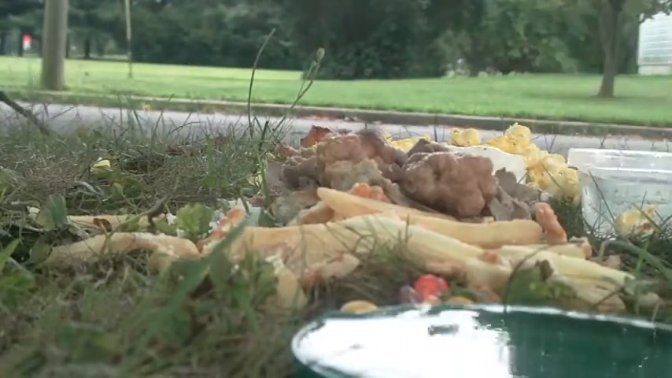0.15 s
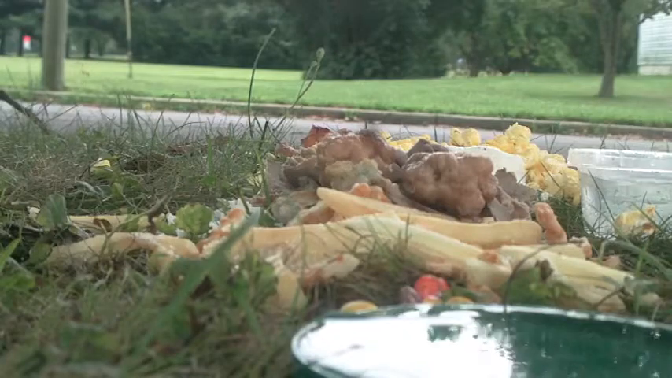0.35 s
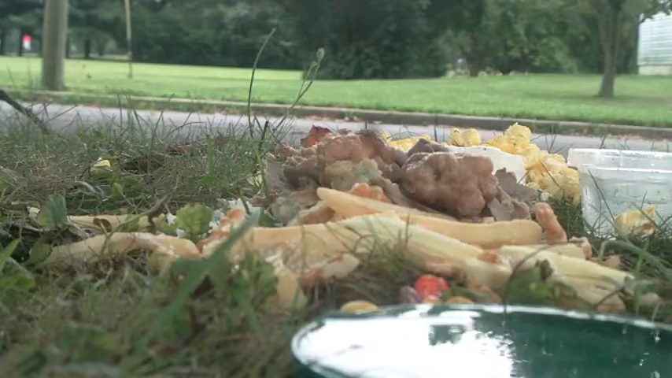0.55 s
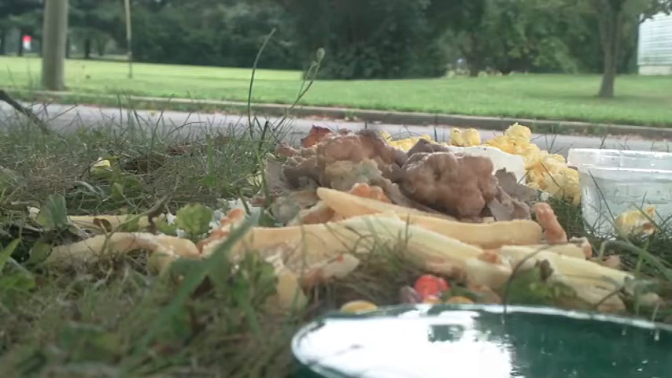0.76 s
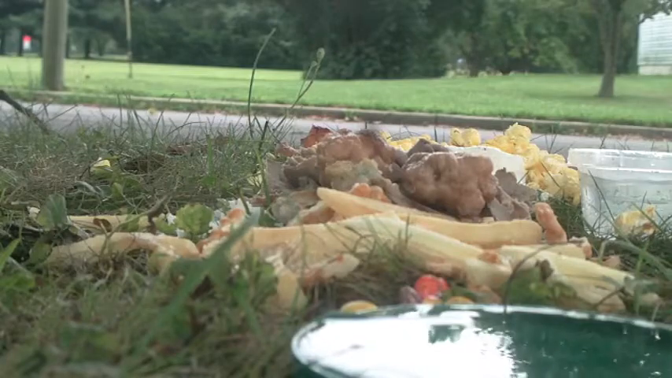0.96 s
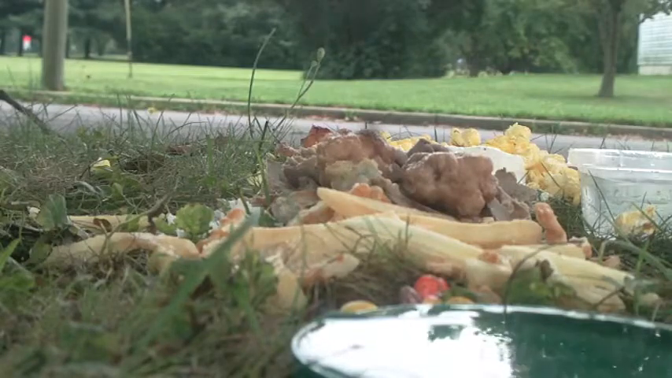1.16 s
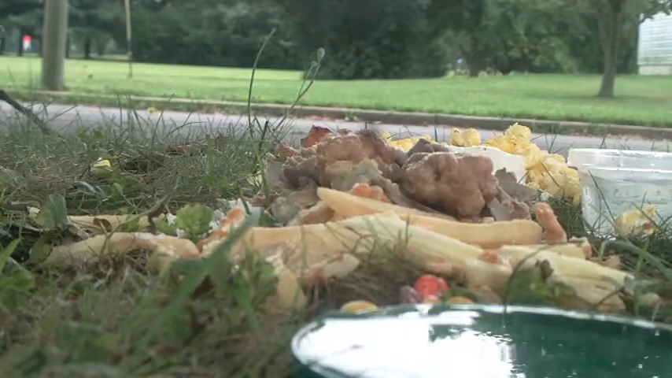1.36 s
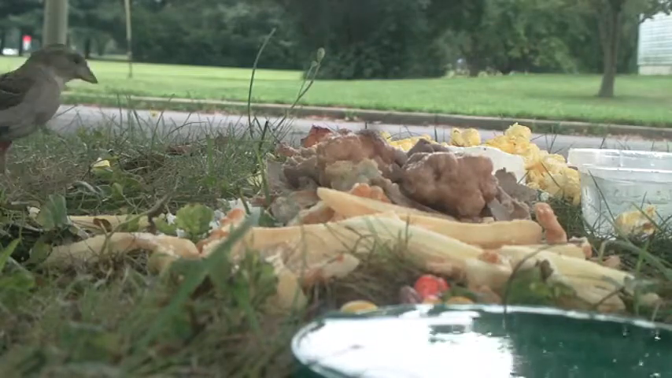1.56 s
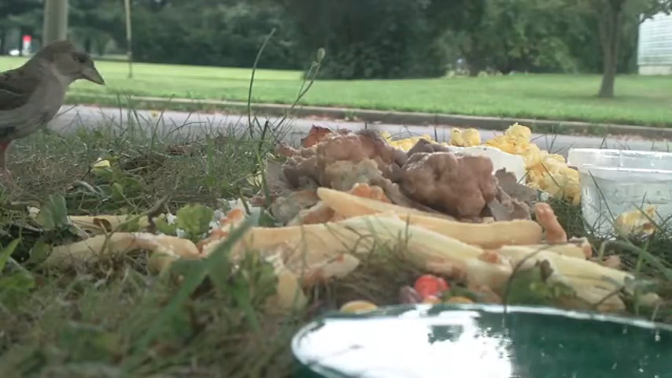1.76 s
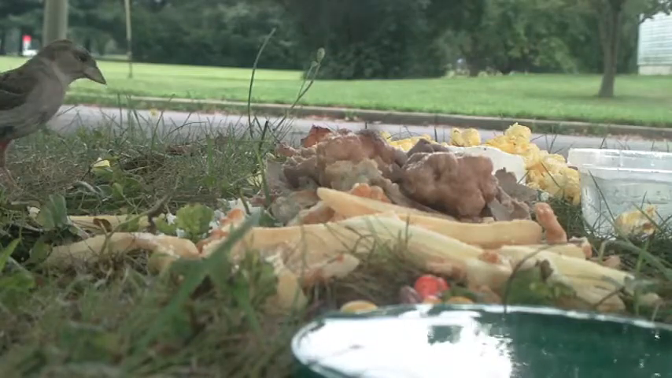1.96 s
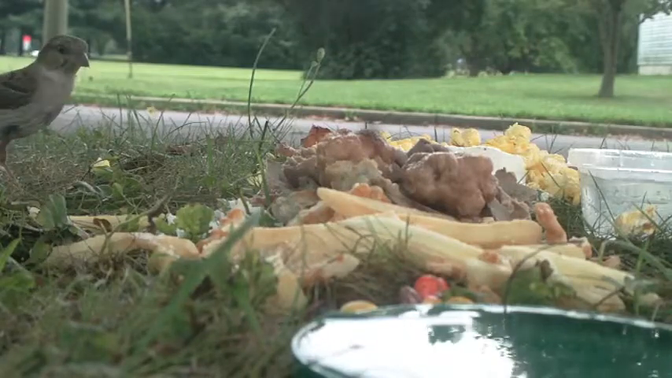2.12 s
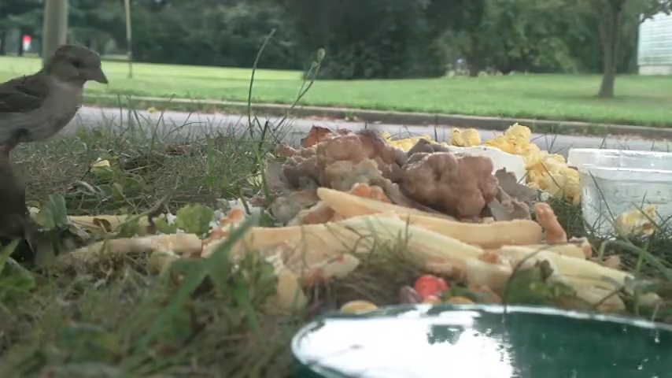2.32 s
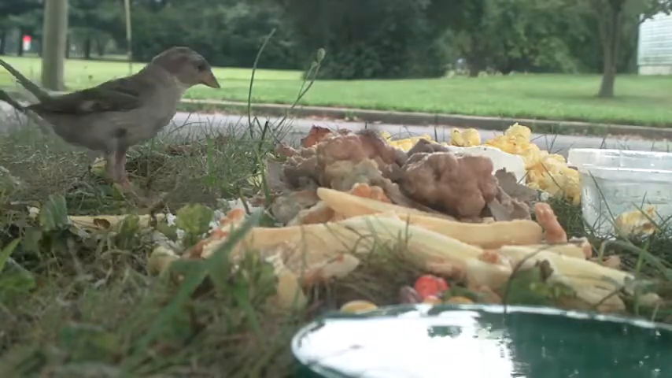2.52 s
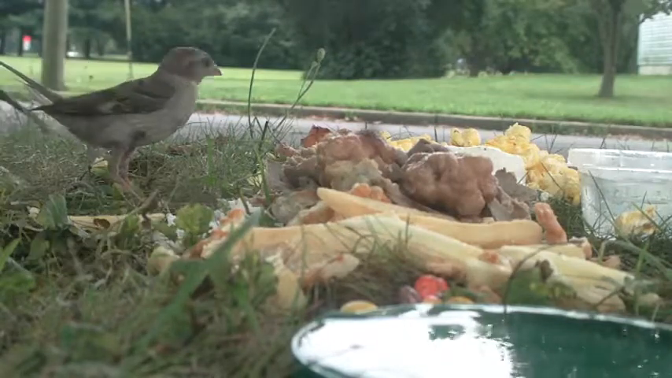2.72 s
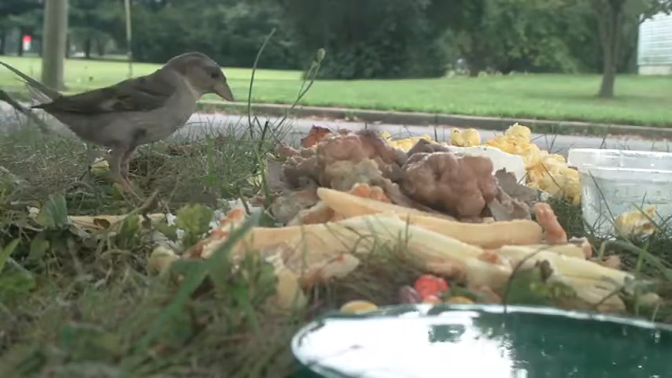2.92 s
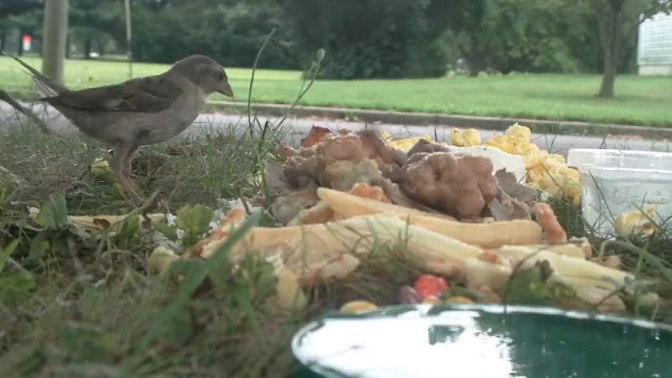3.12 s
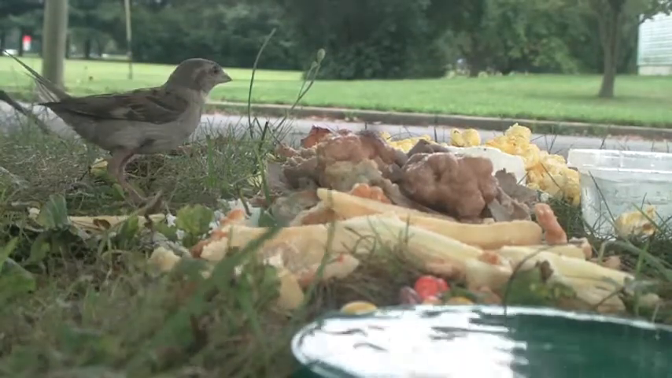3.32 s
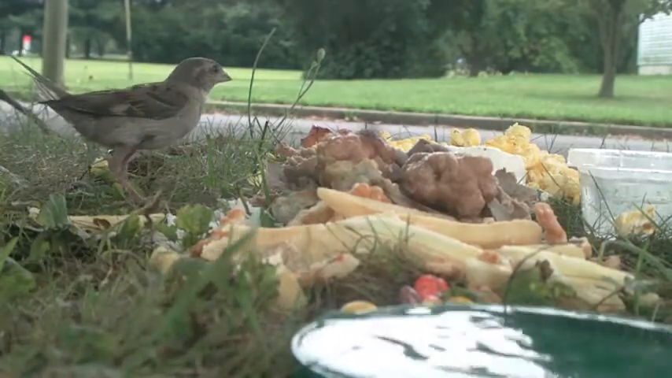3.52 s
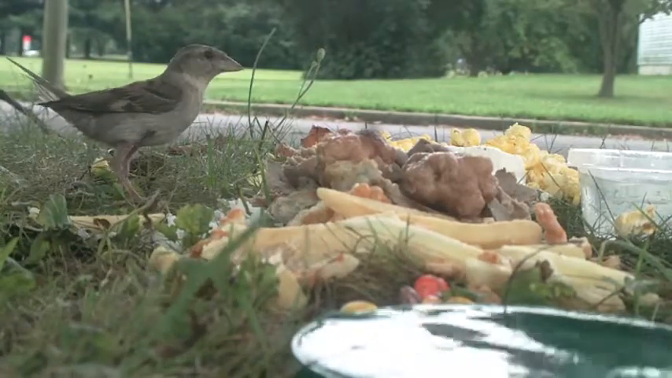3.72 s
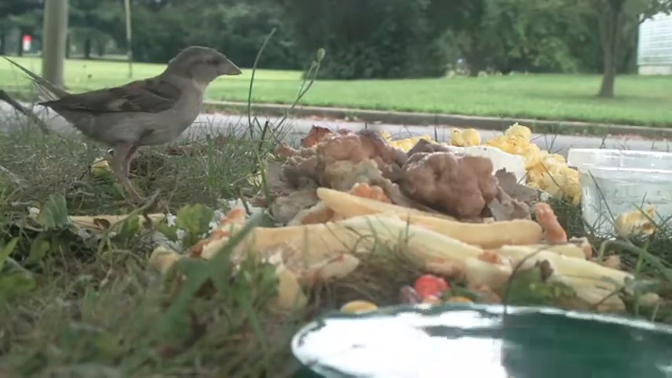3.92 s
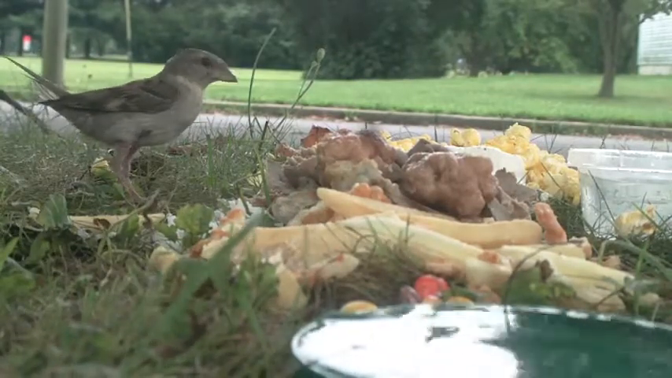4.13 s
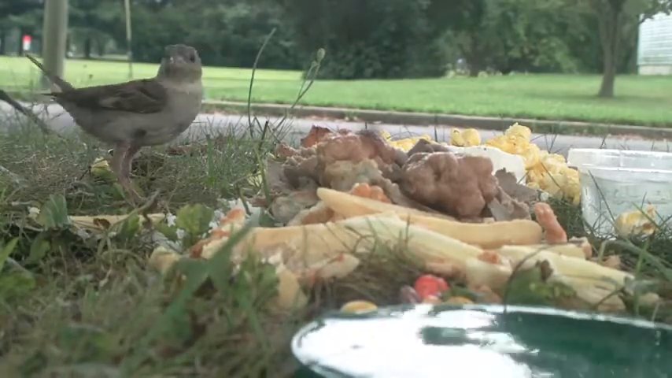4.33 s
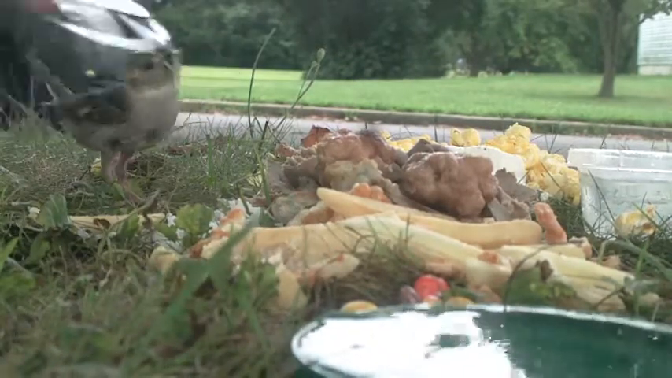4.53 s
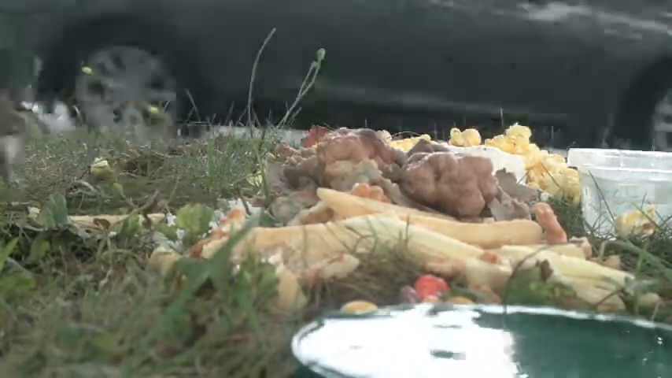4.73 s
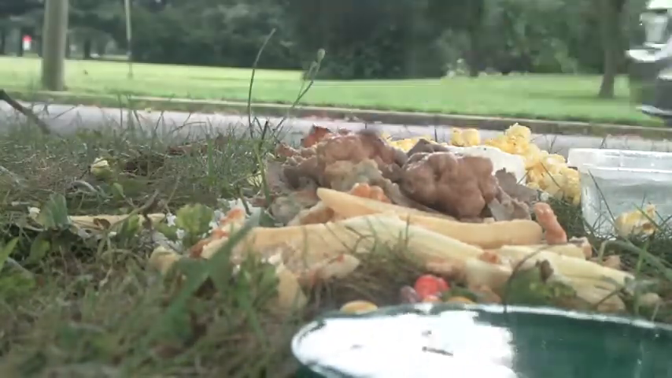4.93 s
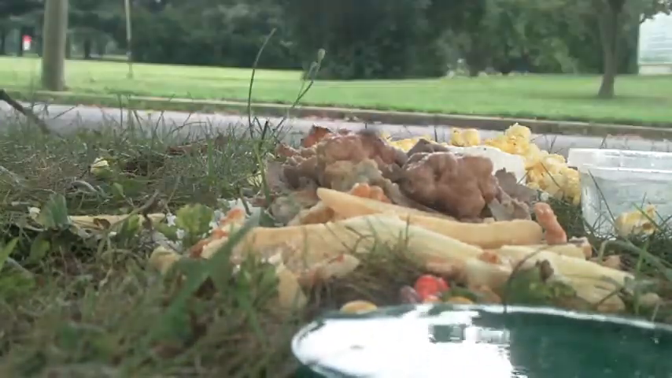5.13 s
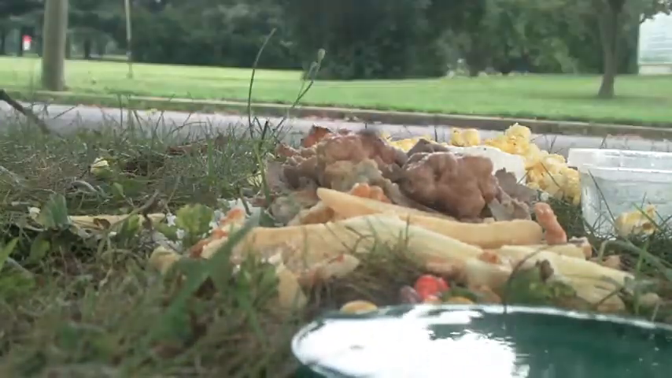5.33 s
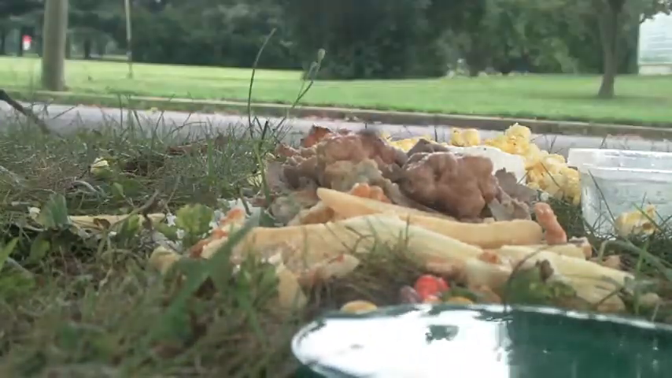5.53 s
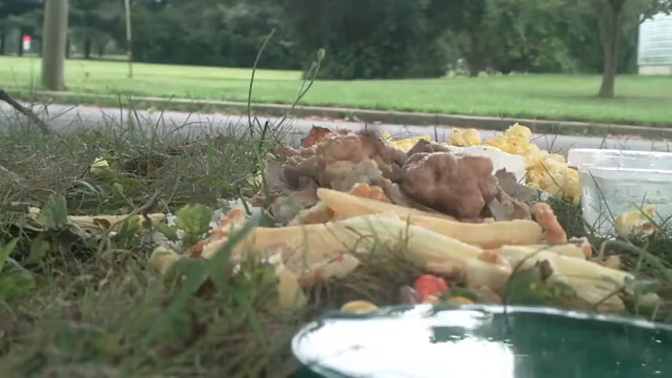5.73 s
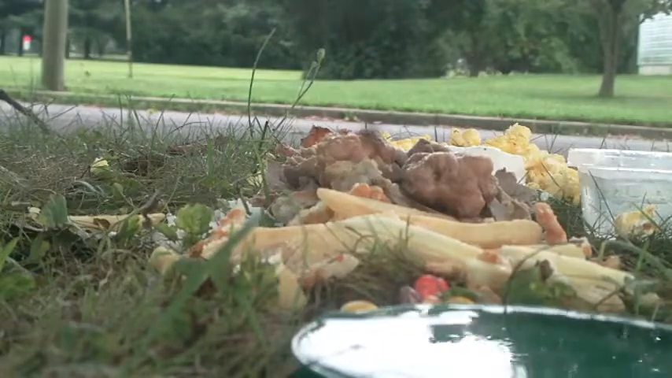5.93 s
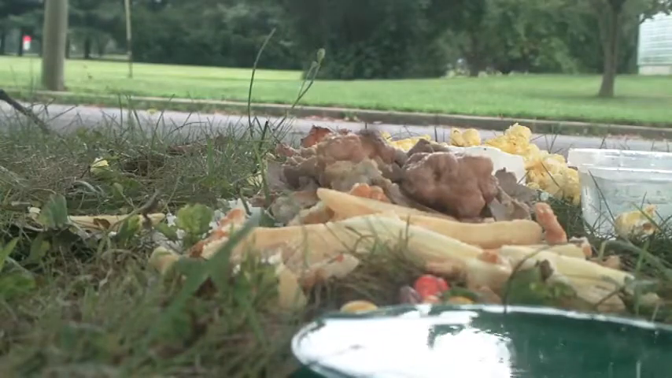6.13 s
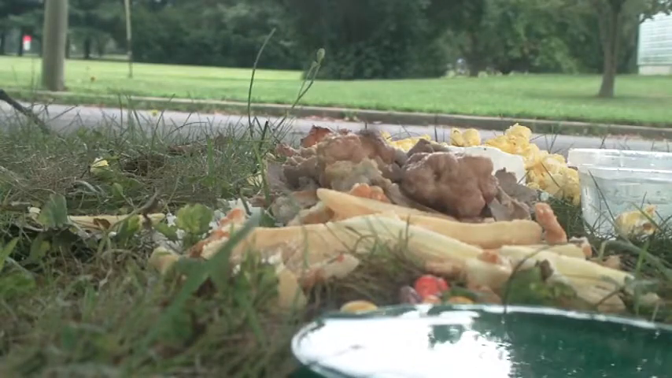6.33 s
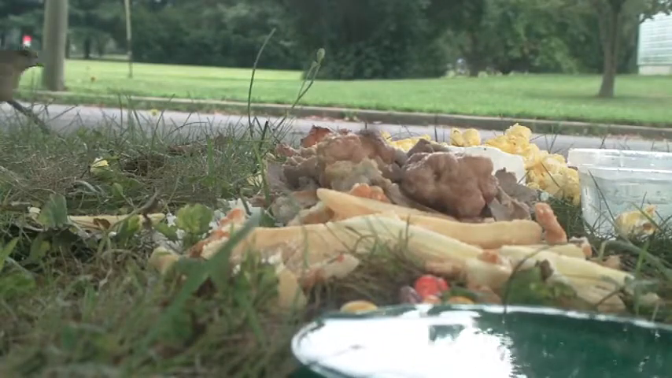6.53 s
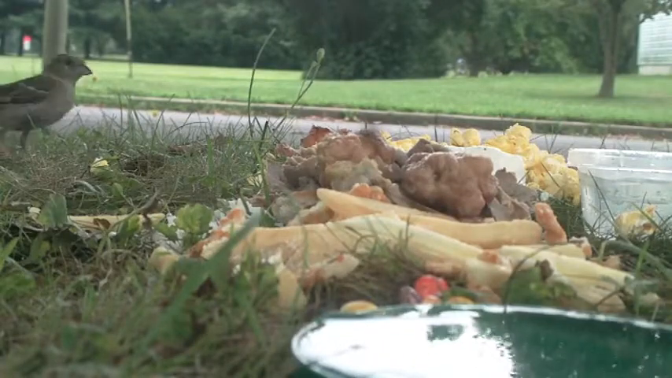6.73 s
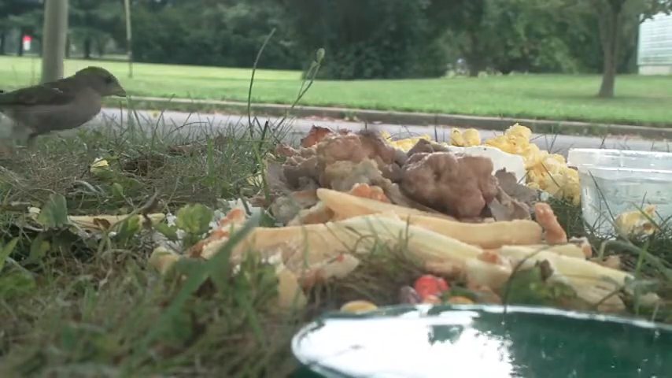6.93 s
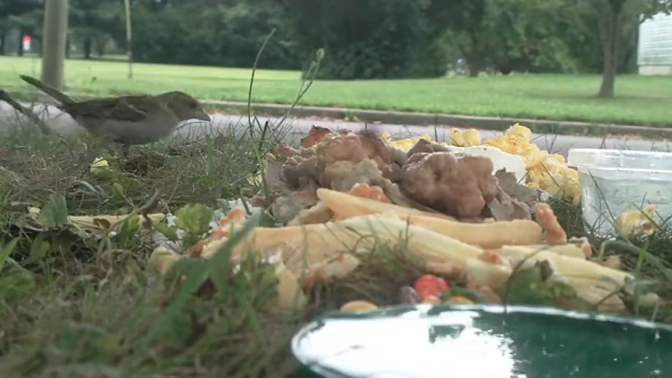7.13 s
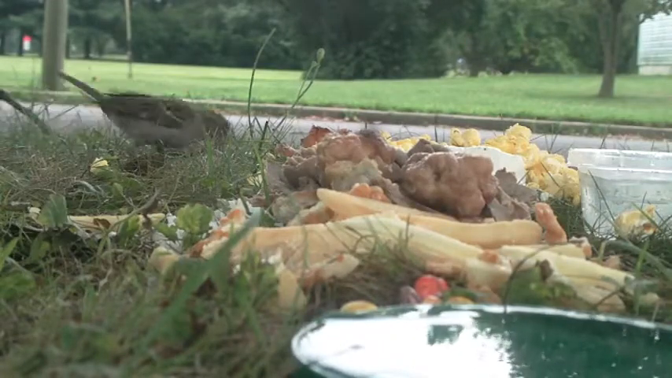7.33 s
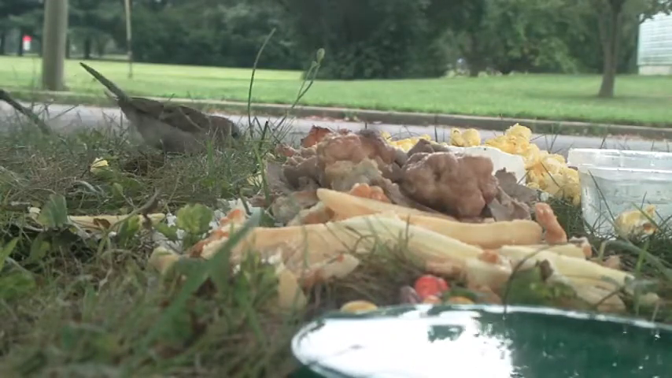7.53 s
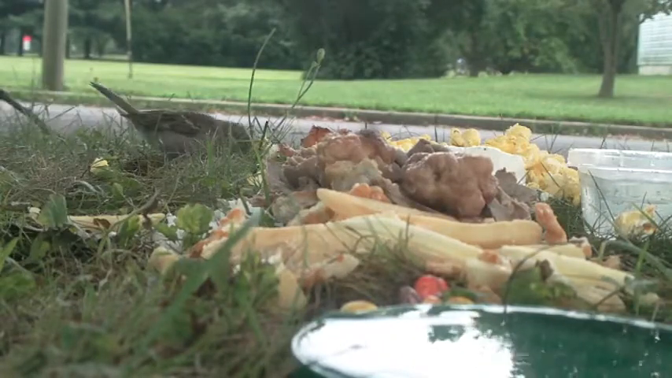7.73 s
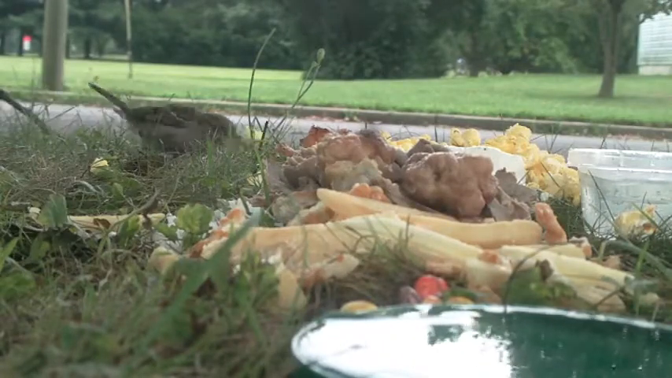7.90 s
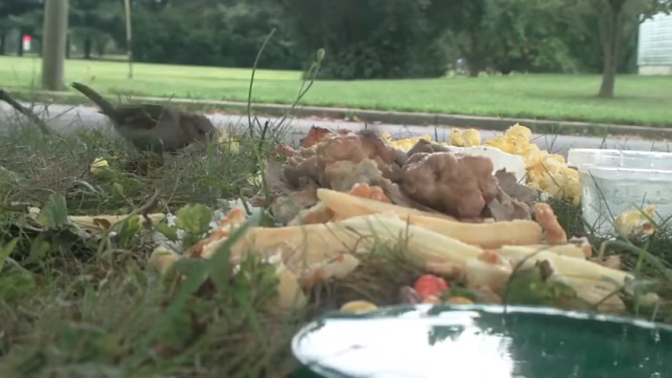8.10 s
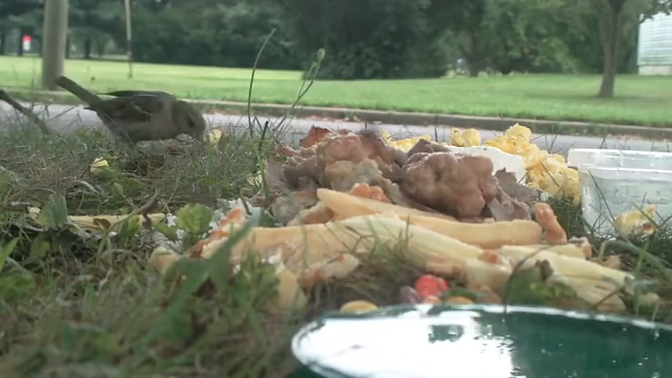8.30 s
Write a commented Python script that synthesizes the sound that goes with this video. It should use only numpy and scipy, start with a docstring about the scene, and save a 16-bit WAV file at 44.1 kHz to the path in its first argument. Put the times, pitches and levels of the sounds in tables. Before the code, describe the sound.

A car sweeps close past a quiet roadside lawn, just after a thudding puff of air hits the microphones; then a sudden quieter hum.

```python
"""A lawn beside a road, in a low town hum with faint birds: a car comes near, sweeps past and leaves.
The car is shaped noise from tyres and body, an exhaust drone, and rough rings as it knocks over uneven asphalt.
Over a second before it is abreast, a puff of air (noise) overloads the microphones, and grass blades tick.
An edit then jumps to a quieter moment, with the next car still far off.
Town and birds are made of noise and sine tones."""
import sys
import numpy as np
from scipy import signal
from scipy.fft import rfft, irfft, next_fast_len
from scipy.io import wavfile
from scipy.ndimage import uniform_filter1d, map_coordinates

SR = 44100
rng = np.random.default_rng(int(sys.argv[2]) if len(sys.argv) > 2 else 0)


def unload_audio(sound):
    """Save the sound as a 16-bit wav file, at the path given as the first command line argument."""
    columns = np.transpose(np.atleast_2d(sound))
    # keep every value between -1 and 1, then stretch to whole-number steps
    steps = np.round(np.clip(columns, -1, 1) * 32767)
    wavfile.write(sys.argv[1], SR, steps.astype(np.int16))


N = 368676
T = np.arange(N) / SR  # time of each sample (s)

# The exhaust of the first car. Each row: time in seconds, pitch in Hz, load in dB.
EXHAUST = [(4.1, 64, -9), (4.35, 62.4, 4.5), (4.55, 60.9, -3), (4.69, 61.5, 4), (4.9, 68.5, -0.5),
           (5.63, 71.5, -1.5), (5.78, 56.9, 1.5), (6.05, 55.8, 0.5), (6.37, 55, 7)]
# Colours of noise, scaled to rms 1 later. Each row: frequency in Hz, relative level in dB per Hz.
TYRE_ROAR = [(200, -18), (400, -1), (620, -2.5), (790, -1.5), (1100, 0.5), (1400, -6.5), (2000, -21),
             (3000, -24.5), (6000, -31.5), (12000, -44)]
TYRE_HISS = [(600, -53), (1200, -2.5), (1800, 2.5), (2300, -3.5), (3200, -9.5), (5000, -15.5),
             (7000, -20.5), (12000, -30)]
TYRE_SIZZLE = [(2000, -22), (4500, 0.5), (9000, 1.5), (11000, 0), (15000, -2.5)]  # the finest tyre noise
BODY_RUMBLE = [(20, -16), (45, 1), (110, 1.5), (160, -2), (210, 1), (255, 5.5), (310, -3), (420, -8),
               (700, -12), (1500, -67)]
TOWN_RUMBLE = [(15, -10), (35, -2), (60, 0), (110, -6), (150, -8), (200, -10.5), (280, -16.5), (400, -23),
               (700, -28), (1700, -32.5), (4000, -41), (8000, -61)]
AIR_PUSH = [(10, -4.5), (18, -6), (36, 0), (60, -5), (110, -22.5), (250, -32), (1000, -61.5)]
AIR_EDDIES = [(20, -2.5), (60, 1.5), (130, -2.5), (250, -10), (420, -17), (700, -34.5), (1500, -40.5),
              (4000, -73)]
PREAMP_HISS = [(1000, -8), (6500, 4.5), (8200, -1.5), (9500, 5.5), (11000, 0), (15000, -0.5)]
GRASS_RUSTLE = [(1500, 9), (3500, 8), (7000, -0.5), (10000, -7), (14500, 4.0)]
# How alike left and right are in the tyre noise. Each row: frequency in Hz, likeness (1 is identical).
TYRE_LIKENESS = [(60, .92), (300, 0.99), (1200, 0.955), (2400, 0.92), (4400, 0.54), (9000, 0.099),
                 (15000, 0.1)]
# How each part of a car carries. The one row: level in dB when abreast, extra dB along the road,
# extra dB to the rear, ground loss in dB per m, extra dB of the second car.
ROAR_CARRY = (-21, -0.8, 0.55, 0.27, 0.5)
HISS_CARRY = (-34.5, 8, 0.05, -0.0071, -3.5)
SIZZLE_CARRY = (-41.5, 2.5, 2.5, 0.04, -3.0)
BODY_CARRY = (-16, -5.0, 0.46, 0.36, 0.3)
EXHAUST_CARRY = (-21.5, -2, 4, 0.15, -30.0)
# Wheels on uneven asphalt. Each row: start in seconds, slap of the tyre in dB, thud of the chassis in dB.
KNOCKS = [(3.993, -22, -30), (4.33, -15, -17), (4.37, -24, -14), (4.422, -14, -26), (4.495, -13, -11.5),
          (4.703, -9, -16), (5.044, -12, -8), (5.734, -21.5, -25), (5.881, -20, -16), (6.219, -20.5, -32)]
# Bursts of turbulence. Each row: middle in seconds, level in dB.
AIR_BURSTS = [(3.431, 1), (3.526, -2.5), (3.602, 1.5)]
# Dry ticks of flicking grass blades. Each row: start in seconds, level in dB, lowest frequency in Hz.
GRASS_TICKS = [(.623, -36, 11570), (1.388, -34, 12000), (2.586, -39, 11500), (3.264, -33, 11000),
               (3.307, -30, 5000), (3.347, -27, 5000), (3.363, -25, 3000), (3.404, -19.5, 3000),
               (3.425, -28, 2980), (3.460, -19, 2000), (3.482, -13.5, 1500), (3.511, -20, 2500),
               (3.519, -21, 3000), (3.545, -26, 2500), (3.577, -17.5, 2500), (3.633, -27, 9000),
               (7.881, -37, 12100)]
# Hum of distant machines. Each row: frequency in Hz, level in dB before the edit, level in dB after it.
MACHINE_HUM = [(38, -53, -45), (49.9, -46, -51), (119.8, -50, -47.5), (446, -63.5, -79)]
# Overtones of a far motor. Each row: multiple of its pitch, level in dB before the edit, level in dB after it.
MOTOR_OVERTONES = [(1, -45, -42.5), (2, -47.5, -40.5), (3, -58, -55), (4, -60.5, -70), (5, -60.5, -65)]
# Pitch of that motor. The one row: Hz before the edit, Hz after it.
MOTOR_HZ = (97, 93.8)
# Distant buzzy calls. Each row: middle in seconds, half-length in seconds, pitch in Hz, width in Hz, level in dB.
BIRD_CALLS = [(.1, 0.1, 5400, 900, -54), (.9, 0.16, 6940, 800, -54), (1.943, 0.13, 6770, 900, -55)]
# Clear peeps. Each row: middle in seconds, half-length in seconds, pitch in Hz, glide in Hz per s, level in dB.
BIRD_PEEPS = [(1.233, 0.03, 2420, -700, -45.5), (1.975, .025, 4300, -7000, -55)]

CUT_S = 6.378  # the edit
PASS_S = 4.71  # the first car is straight ahead
ROAD_M, SPEED_M_PER_S = 5.03, 12.96  # distance to its lane, and its speed
NEXT_CAR_M, NEXT_SPEED_M_PER_S = 46.2, 9.6  # the second car, just after the edit
SIGHT_M, SCREEN_DB_PER_M = 49.8, 0.5  # farther away than this, the road is screened
# T60: the time a ring or tick takes to fall by 60 dB
SLAP_HZ, SLAP_T60_S = 770, 0.057
THUD_HZ, THUD_T60_S = 199.5, 0.16
TICK_T60_S = 0.029
# the puff of air swells, holds and dies away, pulsing as it goes (levels before the overload)
PUFF_S, PUFF_HOLD_S, PUFF_DB = 3.35, 0.15, -3
PUFF_RISE_DB_PER_S, PUFF_FALL_DB_PER_S = 130, 66
PULSE_HZ, PULSE_DB = 22, 3.5
EDDY_DB = -27  # turbulence relative to the push
BURST_HALF_S = 0.026
WAKE_S, WAKE_HALF_S, WAKE_DB = 3.72, 0.18, -29.5  # stirred air left behind
NOTCH_HZ, TOP_HZ = 7830, 15150


def tyres():
    """From afar the grass swallows the roar and leaves a hiss; close by, the roar takes over and flutters."""
    roar_db = pass_by(ROAR_CARRY) + 0.4 * wobble(28)
    roar = amp(roar_db) * patchy(rush(TYRE_ROAR, TYRE_LIKENESS), depth_db=2.5)
    hiss_db = pass_by(HISS_CARRY) + 0.98 * wobble(12)
    hiss = amp(hiss_db) * patchy(rush(TYRE_HISS, TYRE_LIKENESS), depth_db=2.5)
    sizzle = amp(pass_by(SIZZLE_CARRY)) * rush(TYRE_SIZZLE, TYRE_LIKENESS)
    # the tread sings while the car comes on, the same on both sides
    tread = amp(-35.0) * swell(3.97, 0.29) * band(1100, 75)[0]
    return roar + hiss + sizzle + tread


def car_body():
    """Hollow rumble of wheels and chassis: low noise that is identical on both sides."""
    level_db = pass_by(BODY_CARRY) + 0.36 * wobble(18)
    return amp(level_db) * rush(BODY_RUMBLE, [(100, 1.0)])


def exhaust():
    """The engine's drone: a low tone and its octave, with changing pitch, louder under load."""
    pitch_hz, load_db = curves(EXHAUST)
    unsteady_hz = pitch_hz * (1 + 0.015 * wobble(14))
    phase = 2 * np.pi * np.cumsum(unsteady_hz) / SR
    tone = np.sqrt(2) * (np.sin(phase) + amp(-9.5) * np.sin(2 * phase))
    return amp(pass_by(EXHAUST_CARRY) + load_db + 1.2 * wobble(12)) * tone


def knocks(count=24):
    """Each bump sets off a slap and a thud: short, rough rings of many tones spread over an octave."""
    out = np.zeros(N)
    t = np.arange(SR // 4) / SR
    for s, slap_db, thud_db in KNOCKS:
        for db, hz, t60 in (slap_db, SLAP_HZ, SLAP_T60_S), (thud_db, THUD_HZ, THUD_T60_S):
            octaves, start = rng.random((2, count, 1))
            tone_hz = hz * 2 ** (octaves - 0.5)
            ring = unit(np.sin(2 * np.pi * (tone_hz * t + start)).sum(0))
            attack = 1 - np.exp(-t / 0.0017)
            out[round(s * SR):][:len(t)] += amp(db - 60 * t / t60) * attack * ring
    return out


def car_place():
    """The car's distance (m) and bearing (-1 coming .. 1 leaving) as it drives along the straight road."""
    first_m = SPEED_M_PER_S * (T - PASS_S)
    second_m = NEXT_SPEED_M_PER_S * (T - CUT_S) - NEXT_CAR_M
    along_m = np.where(T < CUT_S, first_m, second_m)
    distance = np.hypot(along_m, ROAD_M)
    return distance, along_m / distance


def pass_by(carry):
    """Level in dB of one part of the car: spreading with distance, direction, and loss over the grass."""
    abreast_db, along_db, rear_db, loss_db_per_m, second_db = carry
    distance, bearing = car_place()
    spreading = 20 * np.log10(ROAD_M / distance)
    direction = along_db * bearing ** 2 + rear_db * bearing
    ground_loss = loss_db_per_m * (distance - ROAD_M)
    screen_loss = SCREEN_DB_PER_M * np.maximum(distance - SIGHT_M, 0)
    return abreast_db + spreading + direction - ground_loss - screen_loss + second_db * (T >= CUT_S)


def from_road(pair, delay_s):
    """Sound takes time to travel, so the microphone nearer to the car hears it first."""
    lead = car_place()[1] * delay_s * SR / 2  # in samples
    n = np.arange(N)
    return np.array([map_coordinates(x, [n + sign * lead], mode="nearest") for x, sign in zip(pair, (1, -1))])


def gust():
    """Slow pushes reach both microphones much alike; eddies differ between them; the sum overloads softly."""
    t = T - PUFF_S
    rise_db = PUFF_RISE_DB_PER_S * np.maximum(-t, 0)
    fall_db = PUFF_FALL_DB_PER_S * np.maximum(t - PUFF_HOLD_S, 0)
    pulse_db = PULSE_DB * (np.cos(2 * np.pi * PULSE_HZ * t) - 1)
    push = amp(PUFF_DB - rise_db - fall_db + pulse_db)
    bursts = sum(amp(db) * swell(s, BURST_HALF_S) for s, db in AIR_BURSTS)
    wake = amp(WAKE_DB) * swell(WAKE_S, WAKE_HALF_S)
    turbulence = amp(EDDY_DB) * push + bursts + wake
    air = push * rush(AIR_PUSH, [(50, 0.98)]) + turbulence * rush(AIR_EDDIES, [(100, 0.086)])
    return 0.97 * air / (1 + np.abs(air) ** 6) ** (1 / 6)  # flattens peaks near full scale


def grass():
    """Blades near the microphones rustle in the gust and flick with dry, grainy ticks of noise."""
    rustle_gain = amp(-36.5 + 2.5 * wobble(70)) * swell(3.47, 0.29)
    out = rustle_gain * rush(GRASS_RUSTLE, [(1000, 0.05)])
    t = np.arange(SR // 10) / SR
    for s, db, low_hz in GRASS_TICKS:
        # a new random level about every millisecond makes each tick grainy
        knots = t[::40]
        grain_db = 3 * np.interp(t, knots, rng.standard_normal(len(knots)))
        grains = rng.standard_normal((2, len(t))) * amp(grain_db)
        high_pass = signal.butter(2, low_hz, "high", fs=SR, output="sos")
        crisp = unit(signal.sosfilt(high_pass, grains))
        attack = 1 - np.exp(-t / 0.002)
        out[:, round(s * SR):][:, :len(t)] += amp(db - 60 * t / TICK_T60_S) * attack * crisp
    return out


def birds():
    """Distant birds: thin buzzy calls of narrow noise, and short peeps of gliding sine tone."""
    calls = sum(amp(db) * swell(s, half) * band(hz, width) for s, half, hz, width, db in BIRD_CALLS)
    peeps = np.zeros(N)
    for s, half, hz, glide, db in BIRD_PEEPS:
        t = T - s
        peeps += amp(db) * swell(s, half) * np.sin(2 * np.pi * (hz + glide * t / 2) * t)
    return calls + peeps


def town():
    """Far low rumble of noise, with the hum of machines and a droning motor as wavering sine tones."""
    likeness = [(40, 0.86), (200, 0.95), (1500, 0.7), (5000, 0.37)]
    rumble = amp(-34.5 + 1.5 * wobble(6)) * rush(TOWN_RUMBLE, likeness)
    tones = np.zeros(N)
    for hz, before, after in MACHINE_HUM:
        level_db = np.where(T < CUT_S, before, after) + 4.3 * wobble(4)
        tones += amp(level_db) * np.sin(2 * np.pi * hz * T + 0.83 * wobble(3))
    motor_phase = 2 * np.pi * np.where(T < CUT_S, *MOTOR_HZ) * T + 0.47 * wobble(4)
    for multiple, before, after in MOTOR_OVERTONES:
        level_db = np.where(T < CUT_S, before, after) + 1.37 * wobble(4.6)
        tones += amp(level_db) * np.sin(multiple * motor_phase)
    return rumble + np.sqrt(2) * tones  # a sine of peak sqrt(2) has rms 1


def amp(db):
    """Decibels to gain."""
    return 10 ** (np.asarray(db) / 20)


def unit(x):
    """Scaled to rms 1."""
    return x / np.sqrt(np.mean(x ** 2) + 1e-20)


def along(points, hz):
    """Joins points of (Hz, value) by lines on a log frequency axis."""
    f, v = np.transpose(points)
    return np.interp(np.log(hz + 1), np.log(f + 1), v)


def curves(rows):
    """One value per sample for each column after the time."""
    s, *cols = np.transpose(rows)
    return [np.interp(T, s, c) for c in cols]


def wobble(rate):
    """A smooth random curve through a given number of random points a second."""
    coarse_t = np.linspace(0, T[-1], N // 100)
    points = rng.standard_normal(int(N * rate / SR) + 4)
    return np.interp(T, coarse_t, map_coordinates(points, [coarse_t * rate]))


def swell(s, half):
    """A bell-shaped rise and fall around time s."""
    out = np.zeros(N)
    near = slice(*np.searchsorted(T, [s - 4 * half, s + 4 * half]))
    out[near] = np.exp(-((T[near] - s) / half) ** 2)
    return out


def filtered(x, response):
    """Multiplies the spectrum of x by a response to frequency."""
    m = next_fast_len(N + 8192)
    return irfft(rfft(x, m) * response(np.fft.rfftfreq(m, 1 / SR)), m)[..., :N]


def rush(spectrum, alike):
    """Coloured stereo noise of rms 1: the more mid and the less side, the more alike left and right."""
    m = next_fast_len(N, real=True)
    hz = np.fft.rfftfreq(m, 1 / SR)
    likeness = np.clip(along(alike, hz), -1, 1)
    colour = amp(along(spectrum, hz)) * np.sqrt([1 + likeness, 1 - likeness])
    mid, side = irfft(rfft(rng.standard_normal((2, m))) * colour, m)[:, :N]
    return unit(np.array([mid + side, mid - side]))


def band(hz, width_hz):
    """Narrow stereo noise of rms 1."""
    noise = rng.standard_normal((2, N))
    return unit(filtered(noise, lambda f: 1 / (1 + ((f - hz) / (width_hz / 2)) ** 4)))


def patchy(x, depth_db):
    """Short streaks: a random gain, smooth over frequency and time, and weaker in the treble."""
    z = signal.stft(x, nperseg=2048)[2]
    field = rng.standard_normal(z.shape[1:])
    field = uniform_filter1d(field, size=4, axis=0)  # over frequency
    field = uniform_filter1d(field, size=5, axis=1)  # over time
    hz = np.linspace(0, SR / 2, len(field))[:, None]
    gain = amp(depth_db / (1 + hz / 2500) * unit(field))
    return unit(signal.istft(z * gain, nperseg=2048)[1][:, :N])


def scene():
    """Adds up road, town, birds, air and grass at the two microphones."""
    car = tyres() + car_body() + exhaust() + knocks()
    road = from_road(car, delay_s=5.5e-5)
    tilt = amp([[0.4], [-0.4]])  # road and town lean slightly to the left
    return (road + town()) * tilt + birds() + gust() + grass()


def record(dry):
    """The microphones' electronics add hiss, clip at full scale, cut a narrow notch and limit the band."""
    hiss = amp(-55) * rush(PREAMP_HISS, [(1000, 0.047)])
    clipped = np.clip(dry + hiss, -1, 1)

    def response(hz):
        """A narrow gap in the treble and a steep upper edge."""
        notch = 1 - np.exp(-((hz - NOTCH_HZ) / 250) ** 2)
        return notch / (1 + (hz / TOP_HZ) ** 200)

    return filtered(clipped, response)


dry = scene()
out = record(dry)
unload_audio(out)
```